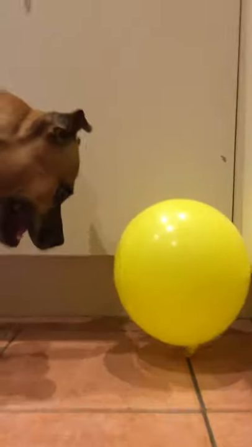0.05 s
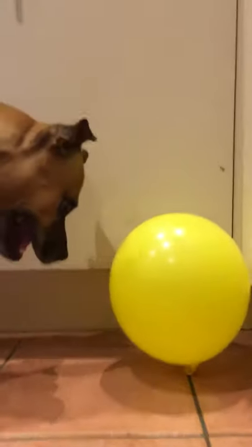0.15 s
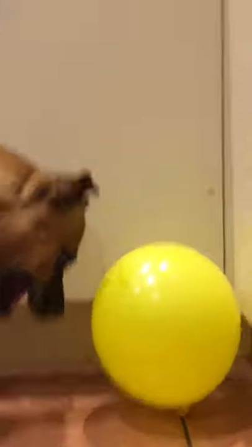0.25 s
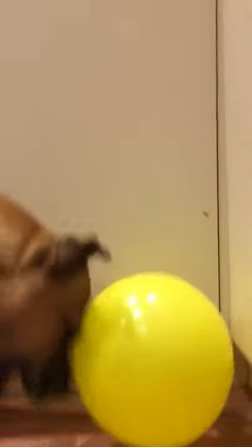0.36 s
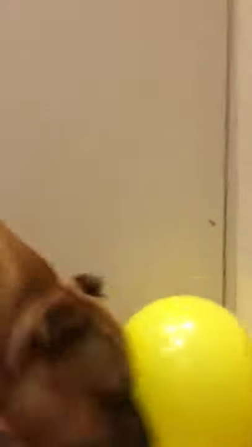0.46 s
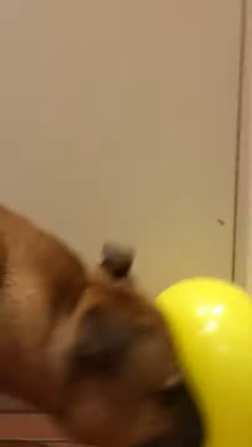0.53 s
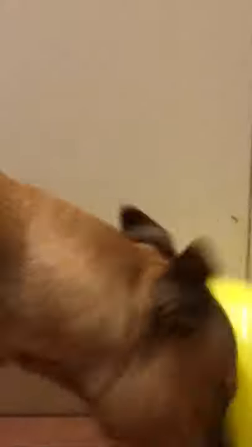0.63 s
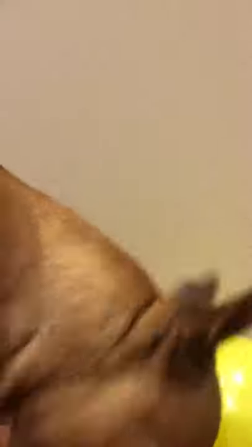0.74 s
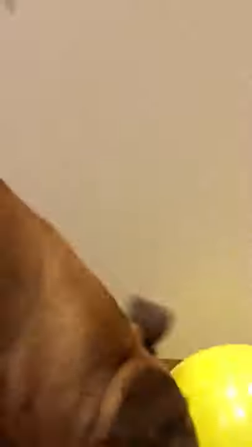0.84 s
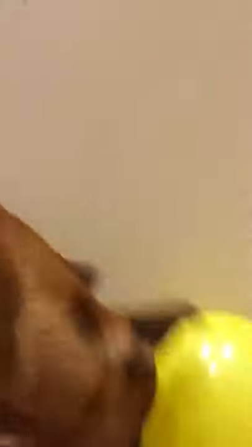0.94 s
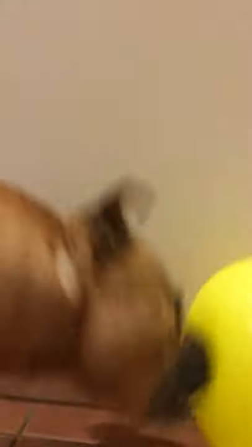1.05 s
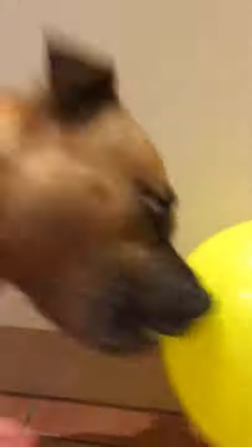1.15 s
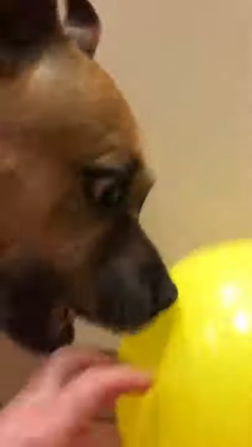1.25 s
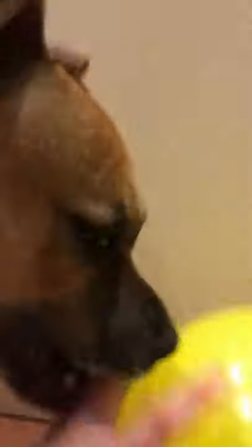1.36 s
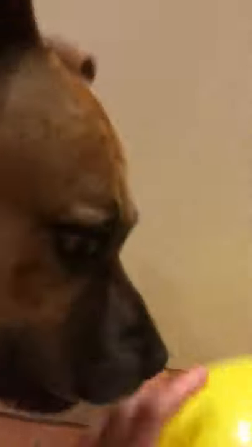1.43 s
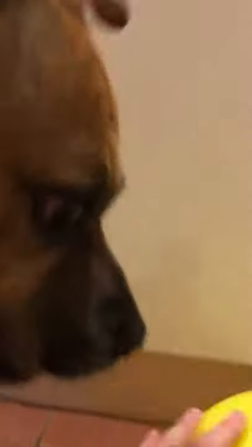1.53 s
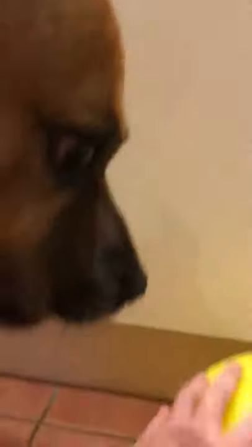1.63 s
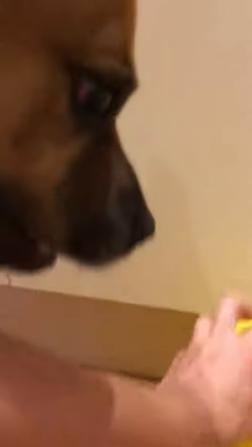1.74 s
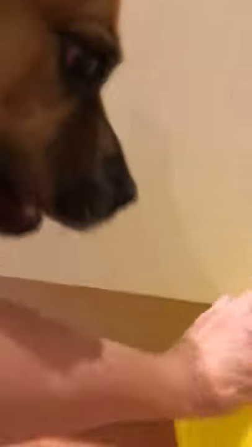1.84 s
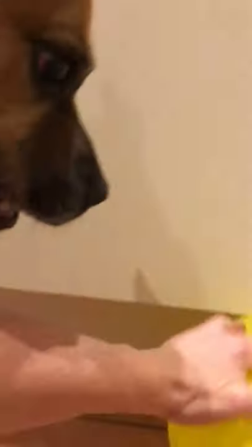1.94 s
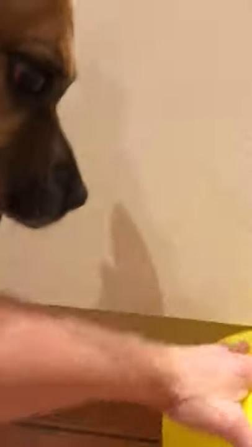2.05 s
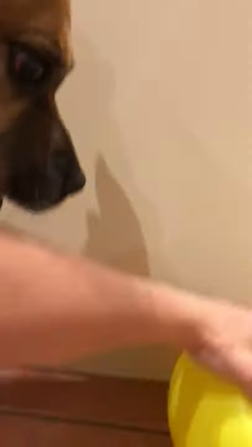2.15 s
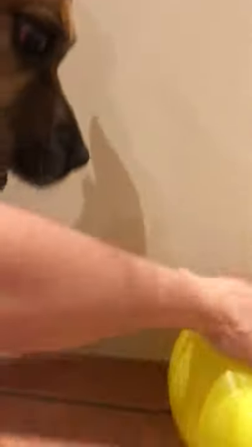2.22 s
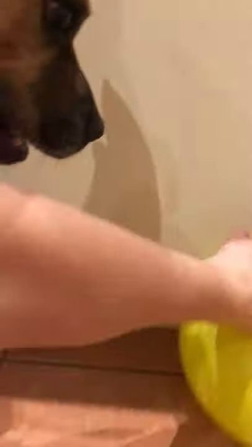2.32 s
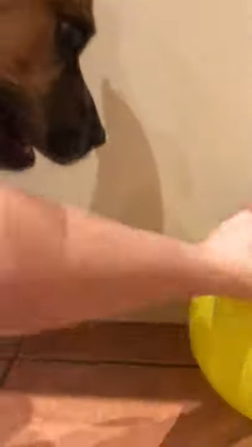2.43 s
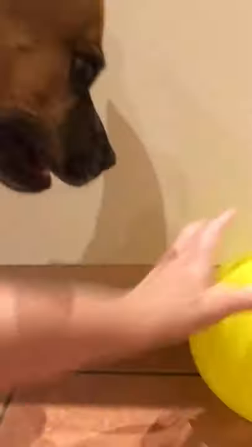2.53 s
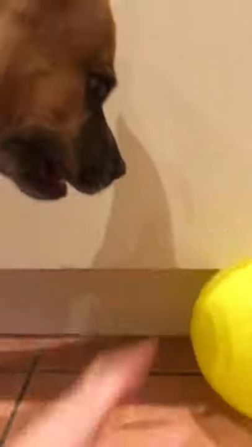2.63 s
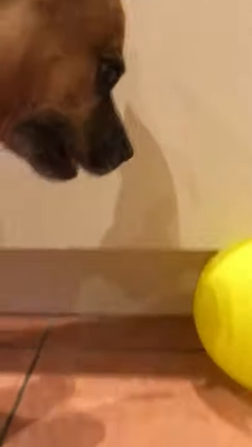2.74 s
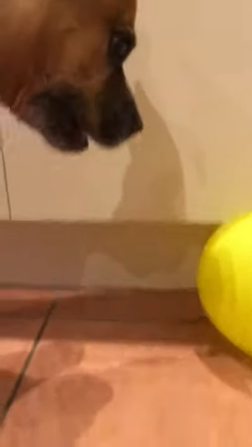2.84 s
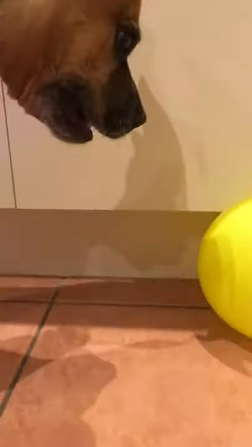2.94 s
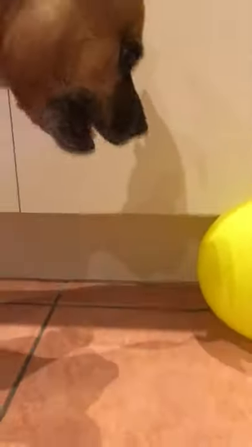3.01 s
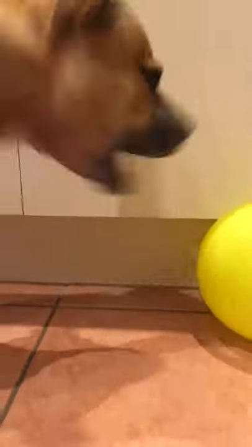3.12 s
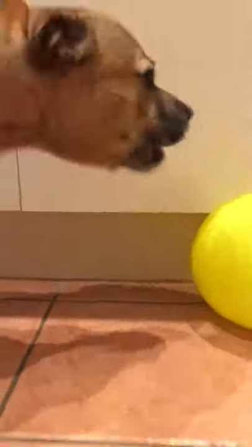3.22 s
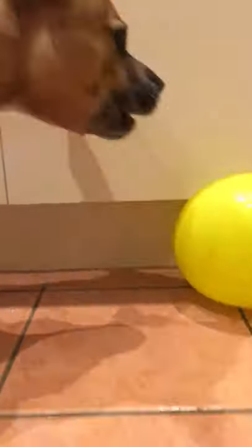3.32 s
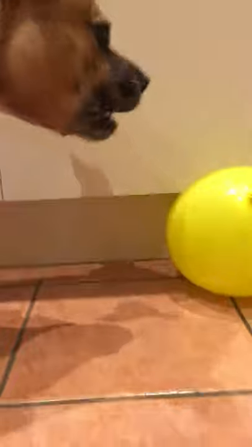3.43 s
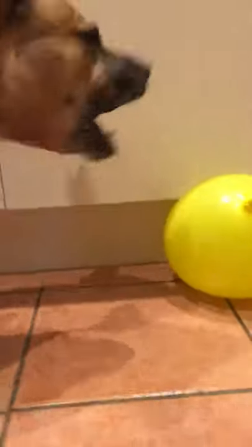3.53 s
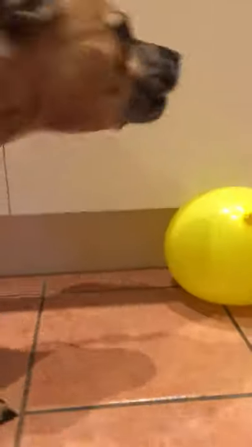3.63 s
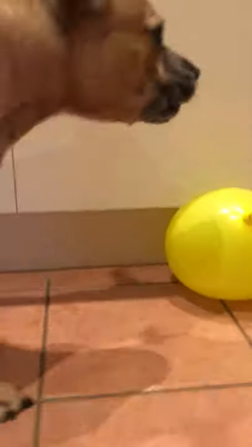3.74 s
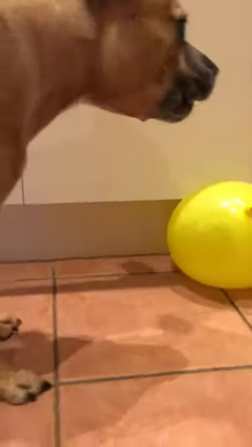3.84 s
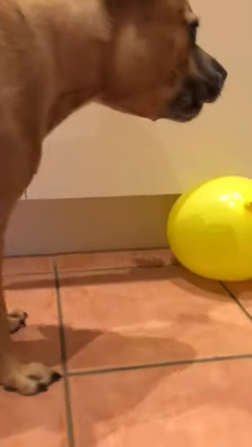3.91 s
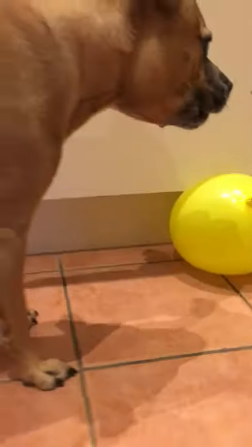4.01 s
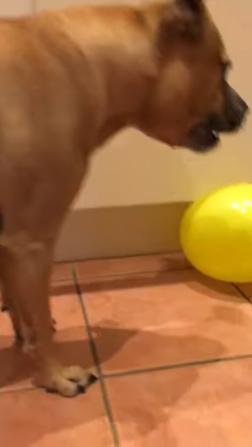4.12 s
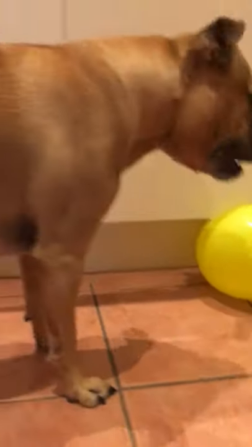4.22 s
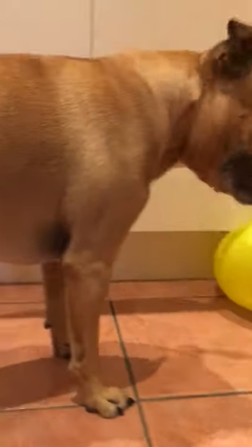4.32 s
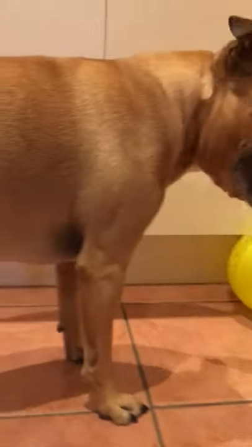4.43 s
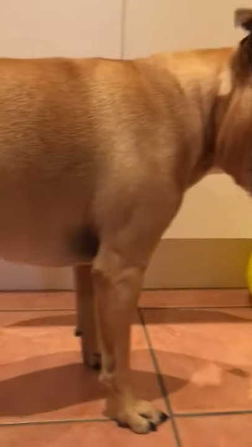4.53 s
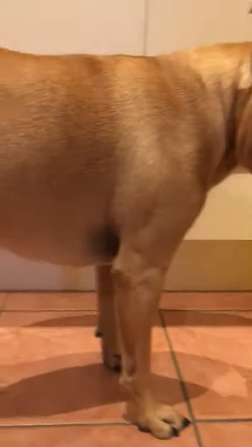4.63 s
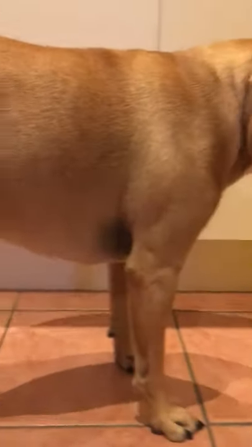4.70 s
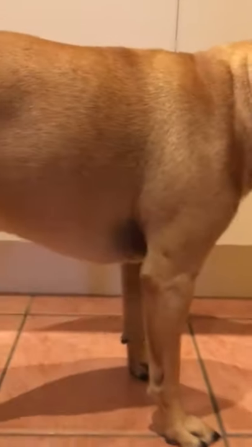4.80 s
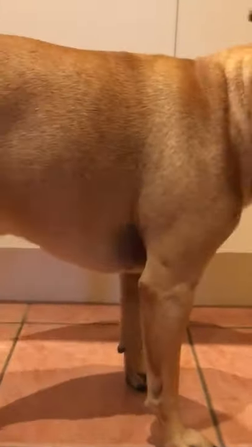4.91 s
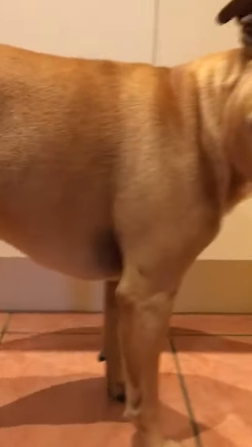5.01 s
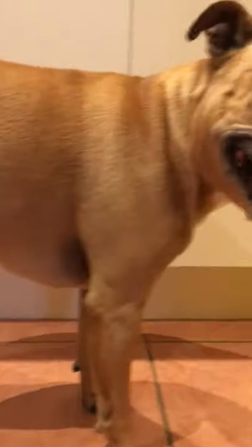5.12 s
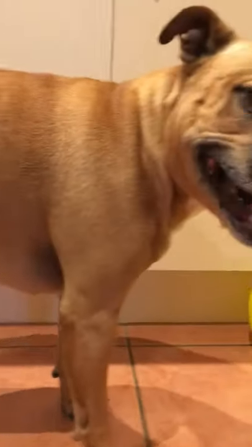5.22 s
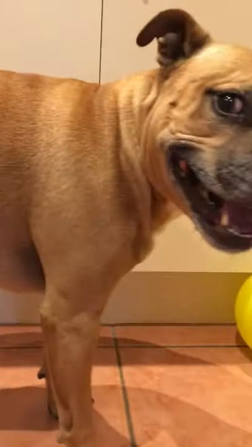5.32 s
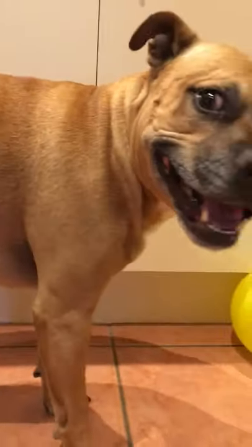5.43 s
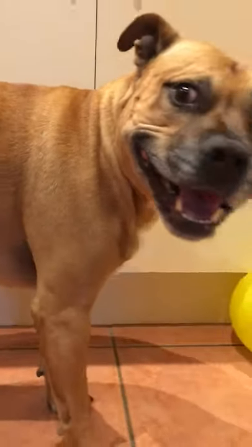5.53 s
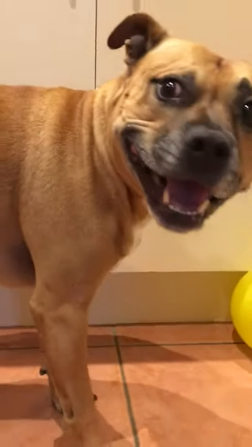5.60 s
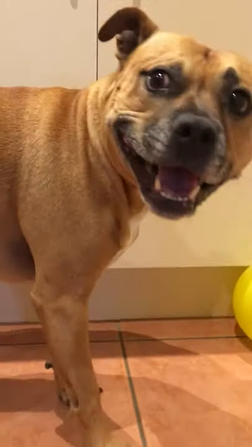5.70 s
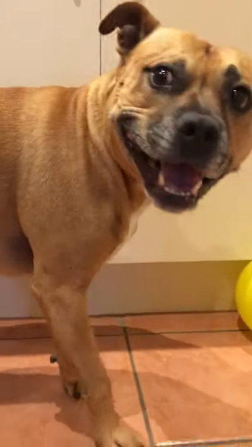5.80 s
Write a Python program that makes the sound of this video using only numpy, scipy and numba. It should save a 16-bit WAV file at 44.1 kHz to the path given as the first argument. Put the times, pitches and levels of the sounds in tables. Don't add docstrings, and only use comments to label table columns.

```python
import sys
import numpy as np
from scipy import signal
from scipy.fft import rfft, irfft, next_fast_len
from scipy.io import wavfile
from scipy.ndimage import uniform_filter1d, minimum_filter1d, map_coordinates
from numba import njit

SR = 44100
rng = np.random.default_rng(int(sys.argv[2]) if len(sys.argv) > 2 else 0)


def voltage_ratio(decibels):
    exponent = np.asarray(decibels, float) / 20
    return 10 ** exponent


def digitize_waveform(pressure):
    field = np.atleast_2d(pressure).T
    bounded = np.clip(field, -1, 1)
    quanta = np.round(bounded * 32767).astype(np.int16)
    wavfile.write(sys.argv[1], SR, quanta)


N = 258426
BLOW_AGE = np.arange(SR // 3) / SR

# frequency in Hz, density in dB per Hz.
ROOM_AIR = [(15, -41), (74, 6), (302, -12), (595, -19), (800, -9), (1530, -4.5), (4920, -23.5),
            (16200, -35.5)]
# time in seconds, level in dB, rumble in dB relative to the rest.
GAIN_RIDE = [
    (0, 0.5, -3.5),
    (2.8, 3, -7),
    (3.16, 3, -5),
    (3.3, 12, -6),
    (3.44, 7, 0),
    (3.55, 1.5, -11),
    (3.9, 3, -13),
    (4.05, -2.5, 0.5),
    (4.3, -3.5, 1.5),
    (5.86, 4.5, -2.5),
]
# frequency in Hz, decay by 60 dB in seconds, level in dB.
ROOM_RING = [(380, 0.85, -27.5), (463, 0.92, 3.5), (620, 0.98, -2), (900, 0.8, 2), (1300, .75, -2.5),
             (2600, 0.88, -1.5), (4153, 0.18, -6), (7000, 0.25, -7.5)]
# frequency in Hz, density in dB per Hz.
HOUSE_HUM = [(15, -4), (49, 3), (97, 3), (155, -8), (240, -12.5), (450, -20.5), (580, -79), (990, -120)]
# time in seconds, level in dB.
HUM_RETURN = [
    (3.95, -69),
    (4.0, -85),
    (4.41, -66.5),
    (4.47, -59.5),
    (4.75, -53),
    (5.86, -53),
]
# start and end in seconds, breath in dB, nose and teeth in dB relative to the breath.
PANTS = [(4.238, 4.296, -89.5, -7, 15.5), (4.487, 4.532, -70.5, -3, 5.5), (4.533, 4.568, -59.5, -4, -10),
         (4.596, 4.662, -72.5, -9, 6), (4.657, 4.735, -65, 7, -4), (4.804, 4.891, -54.5, -6, -12),
         (4.943, 5.052, -60.5, 3, -5.5), (5.132, 5.166, -51, -5.5, -14), (5.183, 5.244, -59, -1.5, -18),
         (5.254, 5.277, -71.5, 9, 14), (5.307, 5.366, -58.5, -9, -16), (5.386, 5.43, -65, -11, 1),
         (5.453, 5.482, -45.5, -4.5, -13.5), (5.502, 5.525, -63, -13, 3), (5.595, 5.694, -58, -6.5, -12),
         (5.79, 5.897, -54, -0.5, -12)]
# resonance in Hz, width in Hz, level in dB.
OPEN_JAWS = [(644, 75, 9.5), (1065, 100, 7.5), (1312, 259, -1), (1950, 648, -3.5), (2590, 140, -6),
             (3250, 75, -3), (4016, 380, -12)]
# frequency in Hz, density in dB per Hz.
NOSE_HISS = [(1760, 9.5), (3000, 10), (3330, -14.5), (3570, -1), (4150, 7), (6500, -9.5), (8450, -23),
             (14300, -120)]
# frequency in Hz, density in dB per Hz.
TEETH_HISS = [(3240, -74), (5500, 1.5), (7680, 0), (8960, 1.5), (10600, -8.5), (11600, -4), (16200, -16.5)]
# start and end in seconds, level in dB, share of the length at the peak.
SNORTS = [
    (0.633, 0.683, -28, 0.5),
    (0.784, 0.833, -25, 0.24),
    (0.931, 0.961, -29.5, 0.51),
    (1.248, 1.306, -28.5, 0.57),
    (1.746, 1.822, -31.5, 0.43),
    (4.642, 4.729, -56.5, 0.37),
]
# resonance in Hz, width in Hz, level in dB.
NASAL = [
    [(1200, 350, 2), (1963, 240, 4), (3030, 540, -2), (4450, 330, -2), (7390, 9900, -9)],
    [(1200, 900, -3.5), (2100, 610, 0.5), (2730, 340, 3), (3240, 260, 1), (3980, 580, -4.5),
     (5760, 710, -8)],
    [(1460, 300, 3.5), (2500, 500, 4.5), (3400, 1000, 6.5), (6400, 7300, 0.5)],
    [(673, 270, -1), (1220, 474, 0.5), (1970, 770, -3.5), (2500, 113, 1.5), (3060, 300, -2.5)],
    [(650, 110, 4), (1180, 920, -9), (2216, 600, -6), (5800, 7800, -12)],
    [(4730, 440, 1), (2260, 260, 2.5)],
]
# time in seconds, peak in dB, ring in Hz, slap in dB relative to the peak.
BUMPS = [(0.489, -13, 317, -21), (0.511, -19, 212, -15.5), (0.546, -21, 343, -28), (0.72, -26, 175, 0.5),
         (0.986, -18.5, 335, -7), (1.016, -22, 339, -22), (1.236, -28, 174, -17), (1.581, -29, 185, -4.5),
         (1.597, -20, 354, -24), (1.74, -21.5, 361, -6.5), (1.759, -19, 345, -5),
         (2.109, -18.5, 332, -10.5), (2.193, -21, 386, -5.5), (2.339, -23, 357, -10), (2.429, -26, 214, -4),
         (2.563, -28, 231, -14)]
# time in seconds, peak in dB, pitch in Hz, decay by 60 dB in seconds.
THUDS = [(.505, -27, 103, 0.17), (0.788, -19, 58, 0.17), (1, -17.5, 66.5, 0.12), (1.087, -14, 58, 0.28),
         (1.623, -23, 46.2, 0.48), (2.205, -25.5, 60.5, 0.44), (2.34, -31, 70.7, 0.14),
         (0.622, -37, 338, 0.036), (0.758, -33.5, 846, 0.2), (0.775, -34, 3960, 0.093),
         (0.8, -33, 3150, 0.11), (1.216, -33.5, 337, 0.073), (1.58, -27, 204, .1), (2.065, -35, 310, 0.16),
         (2.379, -31, 335, 0.15), (2.576, -36, 416, 0.16), (2.71, -42.5, 335, 0.089),
         (2.752, -40, 338, 0.064)]
# time in seconds, peak in dB, pitch in Hz, decay by 60 dB in
# seconds.
SNAPS = [(0.232, -40, 2500, .004), (0.513, -26.5, 900, 0.0076), (0.634, -41, 1800, .006),
         (0.7206, -25, 1100, 0.009), (0.992, -20, 490, 0.014), (0.9967, -14, 380, 0.012),
         (1.017, -17, 300, 0.013), (1.0877, -29.5, 666, 0.071), (1.2391, -23.5, 1266, 0.049),
         (1.7623, -14, 480, .015), (1.5968, -25.5, 900, 0.009), (1.898, -28.5, 252, 0.046),
         (1.903, -30, 845, .015), (2.2668, -8.5, 1120, 0.0064), (2.3544, -7.5, 1150, 0.0067),
         (2.357, -15.5, 699.5, 0.005), (2.343, -22, 1099, .008), (4.308, -47, 1300, 0.017),
         (4.551, -36, 1200, 0.015), (5.1865, -35, 1710, .01), (5.1876, -42.5, 12000, 0.004),
         (5.2315, -35, 1720, .01), (5.502, -26, 9460, 0.0032), (1.3435, -22, 4100, 0.0032),
         (1.3475, -20, 5400, .003), (1.3775, -25.5, 3600, 0.0058), (0.4633, -24, 8930, 0.011),
         (2.127, -19, 600, 0.013), (2.329, -30, 4180, 0.018), (1.09, -23, 140, 0.034)]
# time in seconds, ring peak in dB, ring in Hz, crack in dB.
TICKS = [(0.234, -41, 2500, -49.5), (0.464, -25, 9200, -33), (0.49, -40, 940, -54),
         (0.637, -23, 1850, -40.5), (0.639, -18.5, 8700, -45), (0.656, -22.5, 2020, -42.5),
         (0.696, -50, 7500, -41.5), (0.721, -29, 1180, -36), (0.76, -31, 2350, -51),
         (0.906, -48, 6000, -45.5), (0.934, -30, 2390, -32), (0.947, -33, 3720, -33),
         (0.987, -22, 790, -50), (1.238, -26, 2470, -39), (1.258, -35, 2500, -45), (1.326, -25, 4930, -36),
         (1.344, -34, 2470, -25.5), (1.348, -26.5, 3650, -26), (1.361, -33, 2420, -30),
         (1.3775, -38.5, 2600, -27.5), (1.598, -45, 1200, -50), (1.741, -28, 900, -48.5),
         (1.763, -29, 696, -44.5), (1.779, -43, 8520, -38), (1.787, -40, 8530, -38), (1.903, -28, 790, -55),
         (1.942, -35, 6500, -48.5), (2.127, -22, 710, -50.5), (2.267, -24, 1260, -23),
         (2.305, -28.5, 2200, -29.5), (2.3225, -32, 2070, -30), (2.35, -34.5, 1080, -35),
         (2.355, -19, 1130, -22.5), (2.376, -34, 1020, -35.5), (2.429, -26.5, 1300, -39),
         (2.565, -31, 920, -40.5), (3.114, -52, 1440, -48), (3.559, -58.5, 9100, -66.5),
         (3.884, -43, 9246, -54.5), (4.307, -45, 1304, -74.5), (4.551, -44, 1235, -72),
         (4.556, -34, 1007, -68), (5.187, -33, 1285, -52.5), (5.199, -47, 5180, -64),
         (5.231, -32.5, 1275, -65), (5.502, -35, 8800, -42)]
# ratio to the ring, level in dB.
CLAW_PARTS = [(1, 0), (1.38, -4), (2.05, -15), (2.68, -19)]
# time in seconds, bounce in dB, skin in dB, fall by 20 dB in seconds.
SHOVES = [(0.522, -24, -27.5, 0.06), (0.635, -35, -32.5, -0.175), (0.798, -27, -35, 0.06),
          (.93, -58, -47, -0.5), (1.006, -25, -31, 0.1758), (1.111, -28.5, -36.5, -0.15),
          (1.25, -37, -65, 0.3), (1.602, -26, -37, 0.02), (1.64, -33, -41, 0.21),
          (1.761, -49, -20.5, -0.0376), (2.0, -39.5, -35, 0.39), (2.15, -52, -31.5, 0.2243),
          (2.22, -29.5, -35.5, 0.14), (2.345, -34, -31.5, 0.1155), (2.564, -38, -35, 0.05),
          (2.66, -40, -63, 0), (2.769, -47.5, -66, 0.24)]
# resonance in Hz, width in Hz, level in dB.
BOUNCE_MODES = [(58, 74, 5), (119, 64, 8)]
# resonance in Hz, width in Hz, level in dB.
SKIN_MODES = [(133.4, 24, 0.5), (231, 54, 2), (350, 76, 4.5), (641, 120, -4), (781, 150, -5.5)]
# start and end in seconds, rub in dB, slide hiss in dB.
STROKES = [(-.1, 0.281, -60.5, -61), (0.27, 0.579, -67, -54.5), (0.58, 0.625, -58, -55.5),
           (0.628, 0.692, -44.5, -46.5), (0.713, 0.799, -42.5, -41), (0.824, 0.899, -52.5, -58),
           (0.919, 1.036, -43.5, -45.5), (1.057, 1.294, -53, -48), (1.326, 1.428, -66, -53.5),
           (1.595, 1.653, -71, -52.5), (1.693, 1.897, -52, -56.5), (1.963, 2.024, -42.5, -44.5),
           (2.035, 2.08, -51.5, -54.5), (2.096, 2.137, -44, -48), (2.147, 2.207, -36.5, -41),
           (2.215, 2.306, -43.5, -52.5), (2.326, 2.352, -39, -47.5), (2.364, 2.46, -51.5, -50.5),
           (2.502, 2.565, -51, -54), (2.737, 3.167, -60.5, -61.5)]
# frequency in Hz, density in dB per Hz.
RUB_TONE = [(290, -30.5), (500, -5.5), (750, -12.5), (1050, 2.5), (1320, -6.5), (1600, -3.5), (4000, -12),
            (8800, -100)]
# frequency in Hz, density in dB per Hz.
SLIDE_TONE = [(1500, -18.5), (3000, -5), (6000, -1.5), (9500, -3.5), (10400, -9), (12000, -5),
              (16200, -13.5)]
# time in seconds, effort in dB, throat pitch in Hz, gape 0 to 1,
# fold lock 0 to 1.
BARKS = [
    [(3.158, -39.5, 908, 0.9, 0.6), (3.166, -32.5, 912, 0.9, 0.18), (3.169, -6, 898.4, 1, 0),
     (3.19, -5.5, 880, 0.5, 0.5), (3.213, -5, 848.4, 0.3, 0), (3.219, -6, 629, 1, 0.94),
     (3.293, -9.5, 618.3, 0.4, 0.63), (3.3, -16.5, 514.4, 0.5, 0), (3.39, -40, 572, .15, .3)],
    [(3.606, -43.5, 758, 0.6, 0.04), (3.62, -23, 757.3, 0.9, 0.1), (3.629, -6.5, 790.6, 0.38, 0.82),
     (3.645, -7, 781.6, 0.2, 0.3), (3.667, -6, 750.4, 0.7, 0.58), (3.678, -6.5, 650, 0.6, 0.55),
     (3.702, -12, 602.7, 1, 0.7), (3.725, -16, 583.3, 0, 0.06), (3.85, -43, 560, 0, 0.36)],
]
# time in seconds, resonance in Hz, level in dB relative to effort,
# clean share 0 to 1, throat in dB relative to effort.
JAWS = [
    [(3.16, 1326, -7, 0.24, -7.5), (3.184, 1220, 0, 0.2, -8), (3.195, 1321, -1, 0.35, -6.5),
     (3.21, 1400, -7, 0.4, -7), (3.232, 1272, -2, 0.3, -4.5), (3.25, 1207, -14, 0, 0.5),
     (3.3, 1120, -14, .05, 3), (3.39, 958, -10.5, .05, 0)],
    [(3.617, 1254, -9, 0.1, -1), (3.632, 1288, -.5, 0.65, 0), (3.655, 1169, -1, 0.5, -5),
     (3.675, 1180, 3, 0.76, -8), (3.687, 1220, -3, 0.4, 0), (3.705, 1116, -5.5, 0, -3),
     (3.72, 905, 0.5, 0.6, -3), (3.747, 860, 0, 0.8, -3), (3.85, 900, -4, 0, 3.5)],
]
# resonance in Hz, width in Hz, level in dB.
PALATE = [
    [(1567, 89, 7), (2290, 130, 2), (2800, 800, -8.5)],
    [(1590, 200, -13), (1930, 250, 1.5), (2260, 240, -1), (2470, 170, -7), (3160, 240, -4.5)],
]
# frequency in Hz, density in dB per Hz.
RASP = [(1760, -28.5), (3000, -14.5), (3840, -7), (4780, -25), (5470, -8), (10000, -12.5), (15200, -20.5),
        (16200, -22)]
# time in seconds, peak in dB, pitch in Hz.
JAW_POPS = [
    (3.1675, -12, 1050),
    (3.168, -6, 150),
    (3.611, -21, 168),
    (3.618, -25, 2150),
]
# one level per bark, in dB relative to effort.
CHEST_DB = [-22, -25]
OVERTONES_DB = [-17, -24]

PALATE_DB, PALATE_GROWS, PALATE_LAG_S = [3.5, -2.5], 1.9, 0.018
RASP_DB, RASP_GROWS, RASP_GAPE_DB = [-24, -30.5], 1.08, 4.5
LARYNX_HZ = 415
SHOVE_RISE, REST_BOUNCE_DB, REST_SKIN_DB = 0.73, -51, -63.5
TOUCH_S, RUB_FADE_S, SLIDE_FADE_S = 0.02, 0.095, 0.041
REST_RUB_DB, REST_SLIDE_DB = -60.5, -64
PLAY_ENDS_S = 3.16
PANT_RISE_S, PANT_FADE_S = 0.0537, 0.084
BUMP_T60_S, CLAW_T60_S = 0.083, 0.019
CLAW_CYCLES = 52
TILE_LAG_S, TILE_ECHO = 0.0009, 0.28
MIC_HZ, TOP_HZ, END_HZ = 34.16, 15800, 16630


def unit(x):
    return x / np.sqrt(np.mean(x ** 2) + 1e-20)


def steady(x, span=0.078):
    return x / np.sqrt(np.abs(uniform_filter1d(x * x, round(span * SR))) + 1e-20)


def along(points, hz, column=1):
    p = np.transpose(points)
    return np.interp(np.log(hz + 1), np.log(p[0] + 1), p[column])


def curves(rows, fade=0.0096):
    s, *cols = np.transpose(rows)
    t = np.arange(N) / SR
    gate = np.clip(np.minimum(t - s[0] + fade, s[-1] + fade - t) / fade, 0, 1)
    return [gate] + [np.interp(t, s, c) for c in cols]


def swells(start, end, db, rise_s, fall_s, rest_db=-120):
    t = np.arange(0, N + 32, 32)[:, None] / SR
    before, after = (start - t) / np.abs(rise_s), (t - end) / np.abs(fall_s)
    under = np.maximum(0, np.maximum(before, after))
    power = voltage_ratio(2 * (db - 20 * under)).sum(axis=1) + voltage_ratio(2 * rest_db)
    return np.interp(np.arange(N) / SR, t[:, 0], np.sqrt(power))


def wobble(rate):
    return map_coordinates(rng.standard_normal(int(N * rate / SR) + 4), [np.arange(N) * rate / SR])


def grainy(rate, depth_db, patchy_db=3):
    z = signal.stft(rng.standard_normal(N), nperseg=256)[2]
    field = uniform_filter1d(rng.standard_normal(z.shape), size=3, axis=0)
    field = uniform_filter1d(field, size=12, axis=1)
    patchy = signal.istft(z * voltage_ratio(patchy_db * unit(field)), nperseg=256)[1][:N]
    return patchy * voltage_ratio(depth_db * wobble(rate))


def filtered(x, response):
    m = next_fast_len(N + SR // 2)
    return irfft(rfft(x, m) * response(np.fft.rfftfreq(m, 1 / SR)), m)[:N]


def shaped(x, spectrum):
    return unit(filtered(x, lambda hz: voltage_ratio(along(spectrum, hz))))


def modes(table):
    def response(f):
        return sum((-1) ** k * voltage_ratio(db) * 1j * f * w / (c * c - f * f + 1j * f * w)
                   for k, (c, w, db) in enumerate(table))
    return response


@njit
def glide(x, pole, turn):
    y = np.zeros(len(x))
    for i in range(2, len(x)):
        y[i] = x[i] - x[i - 2] + 2 * pole * np.cos(turn[i]) * y[i - 1] - pole * pole * y[i - 2]
    return y


def place(track, s, sound):
    track[round(s * SR):][:len(sound)] += sound


def ring(db, hz, t60):
    return voltage_ratio(db - 60 * BLOW_AGE / t60) * np.sin(2 * np.pi * hz * BLOW_AGE)


def room_air():
    air = shaped(rng.standard_normal(N), ROOM_AIR)
    duck_db, rumble_db = curves(GAIN_RIDE)[1:]
    rumble = filtered(air, lambda f: 1 / (1 + (f / 220) ** 4))
    return voltage_ratio(-61 + duck_db) * (air - rumble + voltage_ratio(rumble_db) * rumble)


def kitchen(x):
    hz, t, z = signal.stft(rng.standard_normal(SR), SR, nperseg=1024)
    decay_db = along(ROOM_RING, hz, column=2)[:, None] - 60 * t / along(ROOM_RING, hz)[:, None]
    tail = signal.istft(z * voltage_ratio(decay_db), SR, nperseg=1024)[1]
    power = np.abs(z) ** 2
    tail /= np.sqrt(np.sum(power * voltage_ratio(-120 * t / 2.0)) / np.sum(power) * SR)
    return signal.fftconvolve(np.pad(x, (300, 0)), tail)[:N]


def walls(x, count=8):
    lag, sign = rng.uniform(0.002, 0.028, count), rng.choice([-1, 1], count)
    return x + sum(voltage_ratio(-20 - 300 * s) * k * np.roll(x, round(s * SR)) for s, k in zip(lag, sign))


def panting():
    gate, hum_db = curves(HUM_RETURN, fade=0.088)
    start, end, db, nose_db, teeth_db = np.transpose(PANTS)

    def pant(level_db):
        return swells(start, end, level_db, PANT_RISE_S, PANT_FADE_S)

    breath = unit(filtered(grainy(90, depth_db=-2.0, patchy_db=0.5),
                           lambda f: modes(OPEN_JAWS)(f) * f * f / (450 ** 2 + f * f)))
    nose = shaped(grainy(70, depth_db=0.0), NOSE_HISS)
    teeth = shaped(grainy(180, depth_db=1.5), TEETH_HISS)
    hum = shaped(grainy(9.2, depth_db=-1.5), HOUSE_HUM)
    breathing = pant(db) * breath + pant(db + nose_db) * nose + pant(db + teeth_db) * teeth
    return gate * (voltage_ratio(hum_db) * hum + breathing)


def snorts():
    t, out = np.arange(N) / SR, np.zeros(N)
    slips = 0.7 + np.abs(wobble(500))
    for (start, end, db, peak), nose in zip(SNORTS, NASAL):
        loudest = start + np.clip(peak, 0.05, 0.95) * (end - start)
        swell = np.interp(t, [start - 0.006, start, loudest, end - 0.014, end + 0.018], [0, 0.5, 1, 0.4, 0])
        air = slips * grainy(180, depth_db=0.0, patchy_db=2.5)
        out += voltage_ratio(db) * swell * steady(filtered(air, lambda f: modes(nose)(f) ** 2), span=0.02)
    return out


def bumps():
    low, slap = np.zeros((2, N + SR))
    for s, db, hz, slap_db in BUMPS:
        place(low, s, ring(db, hz, BUMP_T60_S) * (1 - np.exp(-BLOW_AGE / 0.0056)))
        place(slap, s, voltage_ratio(db + slap_db + 4.0 - 60 * BLOW_AGE / 0.11))
    slap *= rng.standard_normal(N + SR)
    return low[:N] + filtered(slap[:N], modes([(650, 370, 6), (1339, 1500, -14.0)]))


def thuds_and_snaps():
    out = np.zeros(N + SR)
    for s, db, hz, t60 in THUDS:
        place(out, s, ring(db, hz, t60))
    for s, db, hz, t60 in SNAPS:
        place(out, s, -ring(db, hz, abs(t60)))
    return out[:N]


def claws():
    body, crack, click = np.zeros((3, N + SR))
    crack_fall = 0.56 * voltage_ratio(-60 * BLOW_AGE / 0.024) + 0.37 * voltage_ratio(-60 * BLOW_AGE / 0.042)
    for s, db, hz, crack_db in TICKS:
        parts = sum(ring(db + part_db, k * hz, min(CLAW_T60_S, CLAW_CYCLES / (k * hz)))
                    for k, part_db in CLAW_PARTS if k * hz < TOP_HZ)
        place(body, s, parts * (1 - np.exp(-BLOW_AGE / 0.00087)))
        place(crack, s, voltage_ratio(crack_db + 3.5) * crack_fall)
        click[round(s * SR)] += voltage_ratio(crack_db + 18.5)
    crack = crack * rng.standard_normal(N + SR) + click

    def tile(f):
        echo = 1 + TILE_ECHO * np.exp(-2j * np.pi * f * TILE_LAG_S)
        return modes([(7000, 8000, 0)])(f) / (1 + (f / 13000) ** 4) * echo

    return body[:N] + filtered(crack[:N], tile)


def balloon():
    s, bounce_db, skin_db, fall = np.transpose(SHOVES)
    start, end, rub_db, slide_db = np.transpose(STROKES)
    gate = curves([(0, 0), (PLAY_ENDS_S, 0)])[0]
    bounce = steady(filtered(grainy(27, depth_db=1.5), modes(BOUNCE_MODES)), span=0.05)
    skin = steady(filtered(grainy(60, depth_db=0.0),
                           lambda f: modes(SKIN_MODES)(f) / (1 + (f / 1100) ** 2)), span=0.026)
    rub = shaped(grainy(120, depth_db=2.0), RUB_TONE)
    slide = shaped(grainy(150, depth_db=2, patchy_db=1.2), SLIDE_TONE)
    out = swells(s, s, bounce_db, SHOVE_RISE * fall, fall, REST_BOUNCE_DB) * bounce
    out += swells(s, s, skin_db, SHOVE_RISE * fall, fall, REST_SKIN_DB) * skin
    out += swells(start, end, rub_db, TOUCH_S, RUB_FADE_S, REST_RUB_DB) * rub
    out += swells(start, end, slide_db, TOUCH_S, SLIDE_FADE_S, REST_SLIDE_DB) * slide
    return gate * out


def jaw_pops():
    t, out = np.arange(N) / SR, np.zeros(N)
    for s, db, hz in JAW_POPS:
        age = np.clip(t - s, 0, None)
        swings = hz * (age + 0.0033 * (1 - np.exp(-age / 0.011)))
        out += voltage_ratio(db - 60 * age / 0.048) * np.sin(2 * np.pi * swings) * (1 - np.exp(-age / 0.00046))
    return out


def tube(folds, hz, width_hz):
    turn = 2 * np.pi * hz / SR
    once = glide(folds, np.exp(-np.pi * width_hz / SR), turn)
    return steady(glide(once, np.exp(-np.pi * 1.5 * width_hz / SR), turn), span=0.012)


def barks():
    out, t = np.zeros(N), np.arange(N) / SR
    for rows, upper, chest_db, jaws, roof_db, hiss_db in zip(BARKS, PALATE, CHEST_DB, JAWS, PALATE_DB, RASP_DB):
        gate, effort_db, low_hz, gape, clear = curves(rows)
        mouth_hz, jaw_db, pure, throat_db = curves(jaws)[1:]
        late_db = -40 * np.exp(-np.clip(t - rows[0][0], 0, None) / PALATE_LAG_S)
        palate_db = roof_db + PALATE_GROWS * effort_db + late_db
        rasp_db = hiss_db + RASP_GROWS * effort_db + RASP_GAPE_DB * gape

        waver = wobble(90)
        cycle = np.cumsum(low_hz * (1 + 0.01193 * waver)) / SR
        puff = 1 + 0.44 * np.cos(2 * np.pi * cycle)
        folds = puff * grainy(150, depth_db=-0.5)

        locked = sum(voltage_ratio(db) * np.sin(2 * np.pi * k * cycle)
                     for k, db in enumerate([0] + list(OVERTONES_DB), start=1))
        share = np.clip(clear, 0, 1)
        low = np.sqrt(2 * share) * locked + np.sqrt(1 - share) * tube(folds, low_hz, 200)

        mouth_cycle = np.cumsum(mouth_hz * (1 + 0.015 * waver[::-1])) / SR
        whistle = voltage_ratio(2.5 * waver) * np.sin(2 * np.pi * mouth_cycle)
        rough = 0.7 * tube(folds, mouth_hz, 90) + 0.7 * tube(folds, mouth_hz, 380)
        clean = np.clip(pure, 0, 1)
        mouth = np.sqrt(1 - clean) * rough + np.sqrt(2 * clean) * whistle

        palate = steady(filtered(folds, lambda f: modes(upper)(f) / (1 + (f / 3300) ** 4)))
        rasp = shaped(puff * grainy(300, depth_db=1.5, patchy_db=3.5), RASP)
        chest = unit(filtered(grainy(30, depth_db=3.5), lambda f: modes([(200, 350, 0)])(f) ** 2))

        voiced = gate * (voltage_ratio(effort_db + throat_db) * low + voltage_ratio(effort_db + jaw_db) * mouth)
        out += filtered(voiced, lambda f: 1 / (1 + (LARYNX_HZ / (f + 1)) ** 6))
        out += gate * (voltage_ratio(palate_db) * palate + voltage_ratio(rasp_db) * rasp)
        out += gate * voltage_ratio(chest_db + 0.95 * effort_db) * chest
    return out + jaw_pops()


def scene():
    voice = walls(barks())
    taps = bumps() + thuds_and_snaps() + claws()
    air_bursts = snorts()
    flutter = wobble(320)
    voice_ring = voltage_ratio(-15.5) * kitchen(voice * unit(1.3 + flutter))
    play_ring = voltage_ratio(-10.0) * kitchen(taps + air_bursts * unit(flutter))
    background = panting() + room_air()
    play = taps + air_bursts + play_ring + balloon()
    return (voltage_ratio(0.5) * voice + voice_ring + play + background)[None]


def top_cut(x):
    return signal.sosfilt(signal.butter(12, 16630, fs=SR, output="sos"), x)


def record(dry):
    need = np.minimum(1, 0.98 / (np.abs(dry[0]) + 1e-9))
    gain = uniform_filter1d(minimum_filter1d(need, size=129), size=65)

    def microphone(hz):
        treble = np.where(hz < TOP_HZ, 1, voltage_ratio(-24.5)) * (hz < END_HZ)
        return treble * hz * hz / (hz * hz + MIC_HZ ** 2)

    mix = filtered(dry[0] * gain, microphone)
    return top_cut(mix[None])


dry = scene()
out = record(dry)
digitize_waveform(out)
```